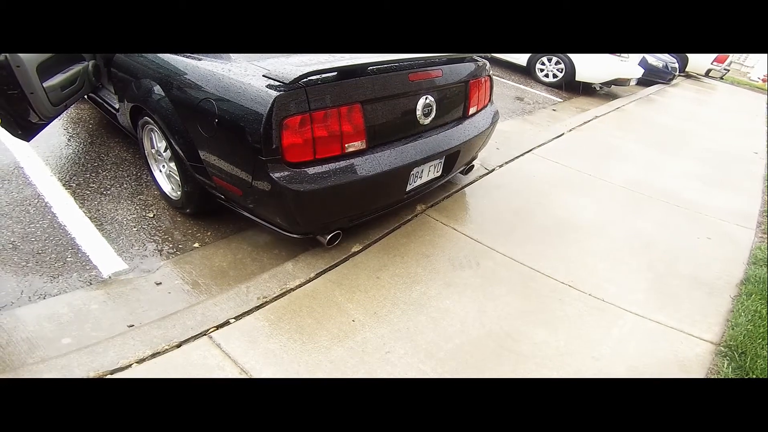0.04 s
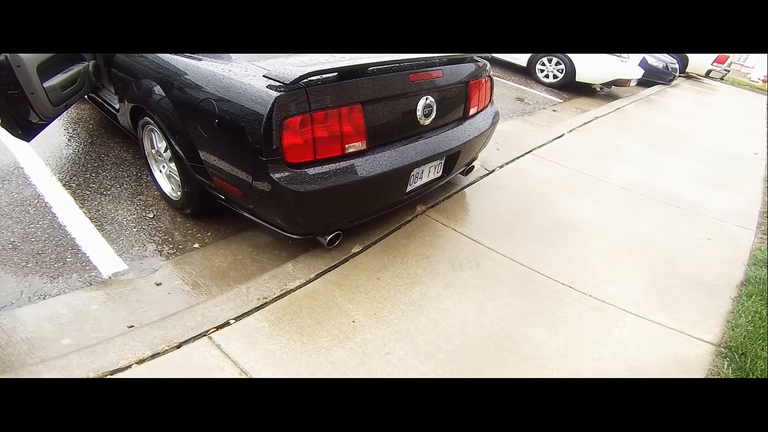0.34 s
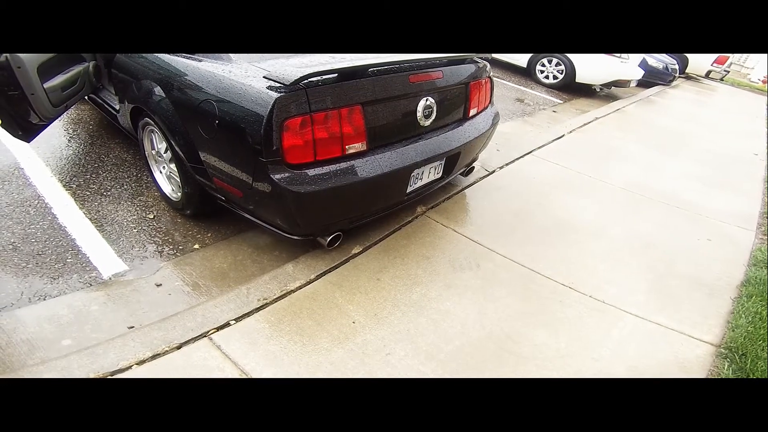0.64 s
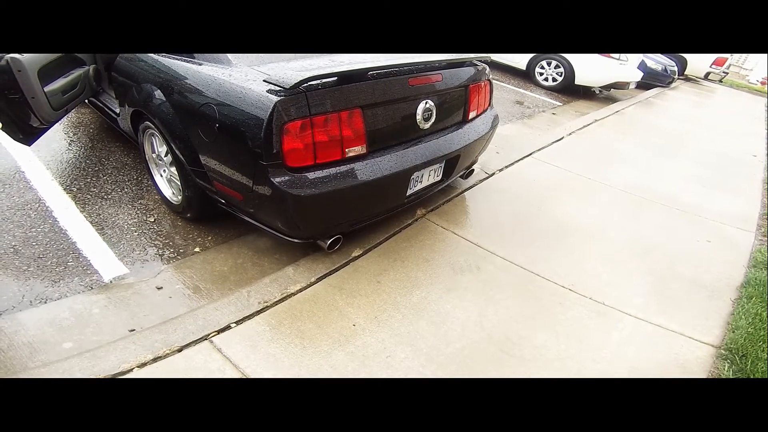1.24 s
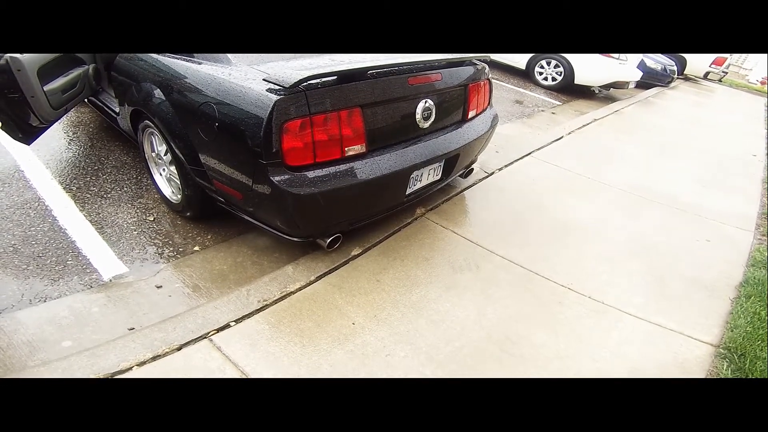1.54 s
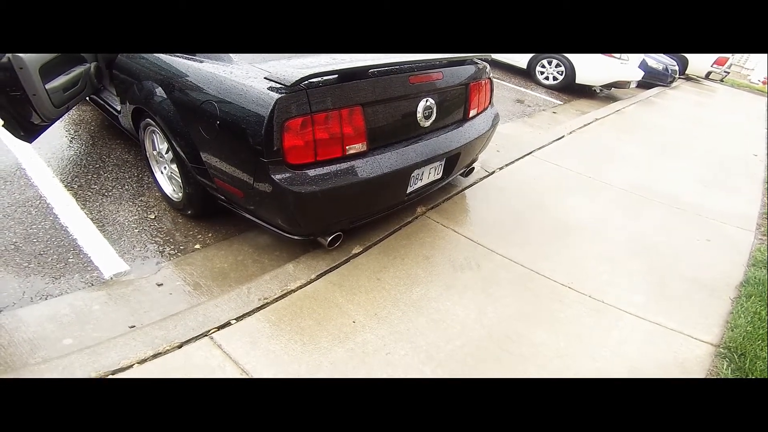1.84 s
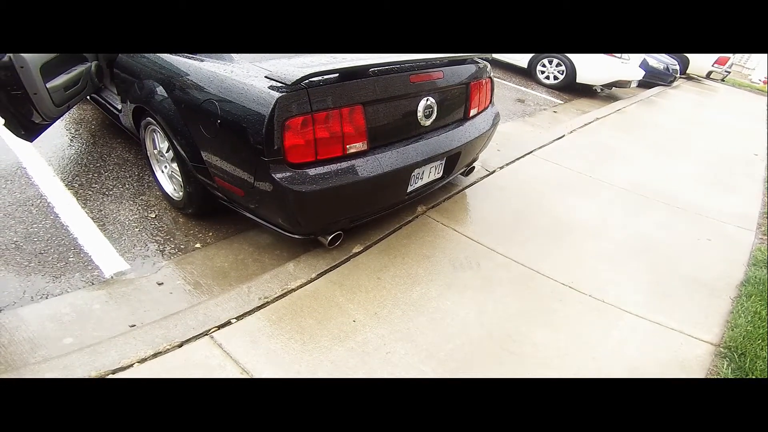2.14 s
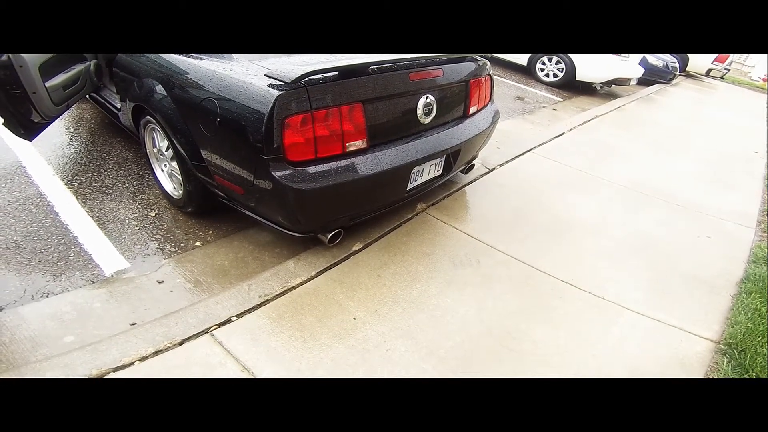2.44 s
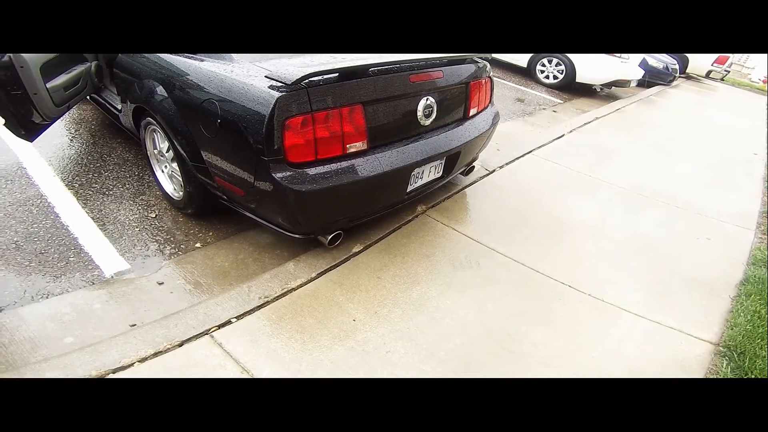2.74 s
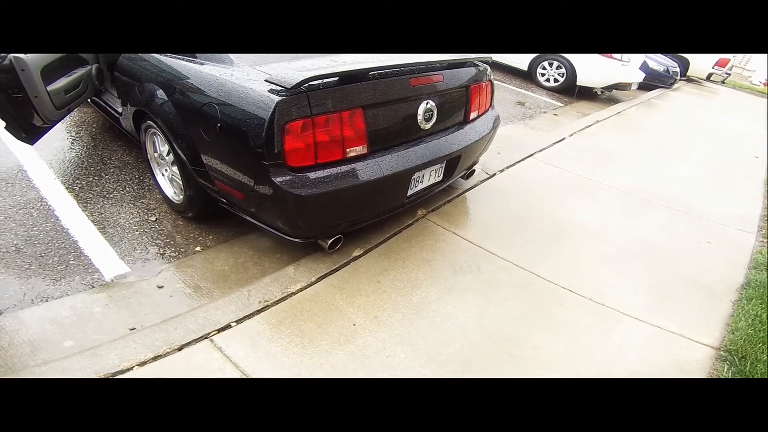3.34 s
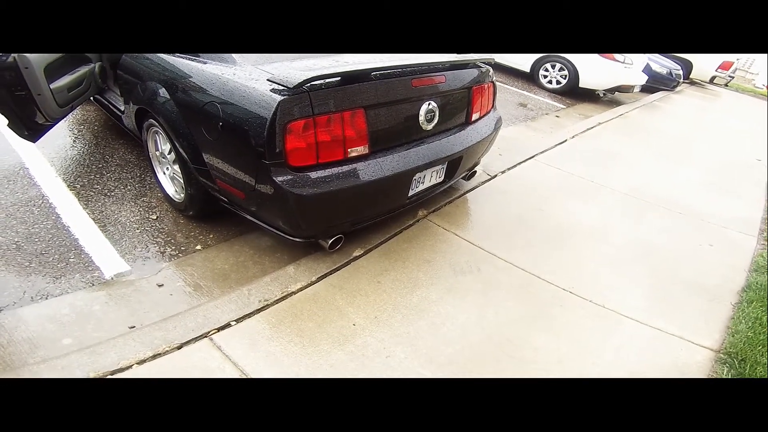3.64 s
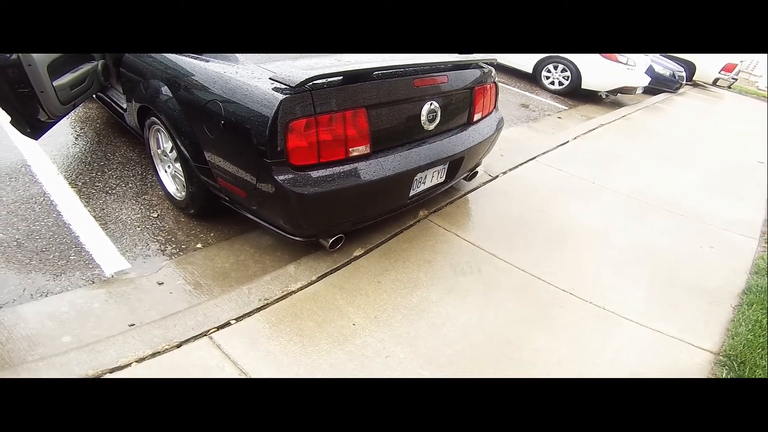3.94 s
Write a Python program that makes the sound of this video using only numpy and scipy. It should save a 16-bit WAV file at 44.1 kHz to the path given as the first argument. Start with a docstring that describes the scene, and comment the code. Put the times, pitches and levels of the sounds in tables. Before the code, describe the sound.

Car exhaust drones at idle, snarls through one quick rev and pops as it settles.

```python
"""A V8 car idles fast in the open air, heard from behind its tailpipes. Eight unequal firings
a cycle ring the exhaust and push out puffs of hissing gas. At 2.5 s one tap on the throttle
sends the revs up, and the pipes boom and snarl. From 3 s the revs fall and late-burning fuel
burbles unevenly. At 3.3 s one sharp crack echoes from the surroundings; by 4 s the engine idles again."""
import sys
import numpy as np
from scipy import signal
from scipy.fft import rfft, irfft, next_fast_len
from scipy.io import wavfile
from scipy.ndimage import uniform_filter1d

SR = 44100
rng = np.random.default_rng(int(sys.argv[2]) if len(sys.argv) > 2 else 0)


def store_pcm(level_fs):
    """Save levels as 16-bit WAV."""
    pcm = np.round(np.clip(level_fs, -1, 1) * 32767).astype(np.int16)
    wavfile.write(sys.argv[1], SR, np.atleast_2d(pcm).T)


N = 176400
T = np.arange(N) / SR


def from_db(db):
    """Decibels to gain."""
    return 10 ** (np.asarray(db) / 20)


def in_time(rows, column=1):
    """One column of a curve at every sample."""
    rows = np.array(rows)
    return np.interp(T, rows[:, 0], rows[:, column])


def colour(x, points):
    """Shape the tone with a (minimum-phase) filter that rings only after it is struck."""
    size = next_fast_len(N + SR // 4, True) // 2 * 2
    hz, db = np.transpose(points)
    log_hz = np.log(np.arange(size // 2 + 1) * SR / size + 1)
    cepstrum = irfft(np.log(from_db(np.interp(log_hz, np.log(hz), db))))
    cepstrum[1:size // 2] *= 2
    cepstrum[size // 2 + 1:] = 0
    return irfft(rfft(x, size) * np.exp(rfft(cepstrum)))[:N]


def rms_one(x):
    """Scale to an average (rms) level of 1."""
    return x / np.sqrt(np.mean(x ** 2) + 1e-20)


def evened(x, size=3700):
    """Hold the level at 1 over about one idle cycle."""
    power = uniform_filter1d(uniform_filter1d(x ** 2, size), size // 2)
    return x / np.sqrt(np.abs(power) + 1e-14)


def clicks(times, sizes):
    """Clicks at the given times."""
    out = np.zeros(N)
    inside = (times >= 0) & (times < (N - 1) / SR)
    np.add.at(out, np.round(times[inside] * SR).astype(int), sizes[inside])
    return out


def fade(x, seconds):
    """Each click jumps to its height and dies away."""
    return signal.lfilter([1], [1, -np.exp(-1 / (SR * seconds))], x + 1e-18)


def scattered(pulses, ring_s, size=2600):
    """A cylinder's own path through the mufflers: the same dying echoes on every cycle."""
    path = rng.standard_normal(size) * np.exp(-T[:size] / ring_s)
    return signal.fftconvolve(pulses, rms_one(path))[:N]


def resonance(x, hz, width_hz):
    """Ring at one moving pitch."""
    decay = np.exp(-np.pi * width_hz / SR)
    turn = np.exp(2j * np.pi * np.cumsum(hz) / SR)
    return np.real(turn * signal.lfilter([1], [1, -decay], x / turn))


def idle_then(idle_db, later_db, throttle_s=2.52):
    """Hold the idle level, then blend into a curve just before the throttle opens."""
    idling = np.clip((throttle_s - T) / 0.093, 0, 1)
    return idling * idle_db + (1 - idling) * later_db


# engine cycles (two turns each) per second: t/s, f/Hz
SPEED = [(0, 12.2), (.4, 12.08), (.8, 11.96), (1.2, 11.96), (1.6, 11.76), (1.8, 11.6), (2.5, 11.52),
         (2.545, 12.2), (2.628, 16.8), (2.696, 20.5), (2.808, 26.1), (2.922, 27.3), (3.0, 26.1),
         (3.1, 23.6), (3.218, 22.4), (3.344, 19.8), (3.544, 16.9), (3.75, 14.1), (4.0, 11.8)]
# cylinders in firing order: thump delay/firing gaps, level/dB, bark delay/firing gaps, level/dB
CYLINDERS = [(0.612, 1.5, .011, 1.2), (0.634, -2, .51, 6), (0.518, 3.5, .95, 1.2), (0.55, 0.05, -.244, 0.2),
             (0.582, 0.5, 1.029, 4), (0.606, 1.5, .953, 1.2), (0.538, 2.56, .706, -1.5),
             (0.517, 2.5, .446, -1.5)]
# uneven burning: t/s, scale of the differences between cylinders, random spread/dB
UNEVENNESS = [(0, 1.85, -0.06), (2.5, 0.91, 0.84), (2.63, 0.94, -0.1), (2.75, 0.38, 0), (2.951, 0.45, 1.3),
              (3.07, 1.37, 4.5), (3.3, 2.7, 3), (3.55, 1.65, 5), (3.75, 1.8, 4), (4, 1.1, 2.3)]


def firings(jitter_s=.00005):
    """Each firing gives a thump, a bark and a valve pulse; they are less regular off the throttle."""
    count = np.cumsum(in_time(SPEED)) / SR * len(CYLINDERS)
    k = np.arange(int(count[-1]))
    cylinder, table = k % len(CYLINDERS), np.array(CYLINDERS)
    s, scale, spread = np.transpose(UNEVENNESS)
    due_s = np.interp(k, count, T)
    scale, spread = np.interp(due_s, s, scale), np.interp(due_s, s, spread)
    capped = np.minimum(scale, 1)
    quirks = (table - table.mean(0))[cylinder].T * np.array([scale, scale, capped, capped])
    thump_late, thump_db, bark_late, bark_db = table.mean(0)[:, None] + quirks
    shift, change_db = spread * np.clip(rng.standard_normal((len(k), 2)), -2, 2).T
    thump_s = np.interp(k + thump_late, count, T) + jitter_s * shift
    bark_s = np.interp(k + bark_late, count, T) + jitter_s * shift
    thumps = clicks(thump_s, from_db(thump_db + change_db))
    barks = clicks(bark_s, from_db(bark_db + change_db))
    valves = [clicks(bark_s, from_db(change_db / 2) * (cylinder == c)) for c in range(len(CYLINDERS))]
    return thumps, barks, valves


# the pipes' low notes: f/Hz, level/dB
BASS_TONE = [(4, -78), (25, -24), (45, -26), (62, -7), (95, -7), (125, -18.5), (165, -14), (192, -41.5),
             (216, -25.5), (245, -35), (330, -68), (900, -109)]
# their rise and fall: t/s, level/dB
BASS_LEVEL = [(0, -15), (1.1, -14.5), (1.9, -14), (2.58, -12.5), (2.66, -15), (2.72, -25), (2.82, -30),
              (2.95, -40), (3.06, -20), (3.28, -29), (3.335, -43), (3.39, -25), (3.46, -21.5), (3.56, -21),
              (3.7, -24), (3.8, -22), (4, -20.5)]


def bass(thumps):
    """Thumps ring the pipes' deepest notes."""
    return -evened(colour(thumps, BASS_TONE)) * from_db(in_time(BASS_LEVEL) - 0.58)


# the pipes' middle notes: f/Hz, level/dB
BARK_TONE = [(100, -63), (280, -28), (320, -36), (355, -11.5), (385, -15.5), (405, -21.5), (422, -13),
             (442, -22.5), (462, -19), (520, -42.7), (660, -54), (840, -27.5), (890, -44.5), (950, -34),
             (1100, -53), (4000, -78.5)]
# their rise and fall after the idle: t/s, level/dB
BARK_LEVEL = [(2.52, -20), (2.66, -14.5), (2.72, -20.5), (2.77, -20.5), (2.97, -24), (3.02, -24.5),
              (3.11, -19.5), (3.24, -25.5), (3.3, -22.5), (3.33, -34.5), (3.4, -29), (3.46, -19),
              (3.5, -23.5), (3.7, -22.5), (3.85, -22), (4, -22.5)]
# tone of swirling gas: f/Hz, level/dB
RASP_TONE = [(20, -70), (150, -30.5), (300, 2.5), (420, 7), (480, 3), (570, 0.5), (680, -11), (840, 6),
             (980, 5.5), (1060, -9.5), (1180, -1), (1370, -20.5), (1550, -8), (1850, -14.5), (2200, -30.5),
             (4000, -59.5)]


def rough_bark(barks, growls, puffs):
    """Firings bark in the pipes and growl in the mufflers while swirling gas rasps."""
    speed = in_time(SPEED)
    growl_db = -10.5 + 0.6463 * (speed - speed.min())
    rasp_db = -12 - 1.1 * in_time(UNEVENNESS, column=2)
    uneven = np.clip(in_time(UNEVENNESS) + 0.084, 0, 1)  # even firing barks less
    bark = evened(colour(barks, BARK_TONE)) * uneven
    growl = evened(colour(growls, RASP_TONE)) * from_db(growl_db)
    rasp = evened(colour(puffs * rng.standard_normal(N), RASP_TONE)) * from_db(rasp_db)
    return (bark + growl + rasp) * from_db(idle_then(-18, in_time(BARK_LEVEL) + 1))


# tone of escaping gas: f/Hz, level/dB
HISS_TONE = [(900, -5.5), (1800, -1), (2270, -10), (2620, -2.5), (3200, -8), (3700, -4), (4370, 0.5),
             (4640, -0.5), (5040, -6.5), (5360, -4), (6450, 0), (7400, -11.5), (7900, -8.5), (9050, -6.5),
             (11000, -17), (13100, -21), (15000, -34)]
# its rise and fall after the idle: t/s, level/dB
HISS_LEVEL = [(2.52, -32.5), (2.59, -23.5), (2.675, -19.5), (2.71, -30), (2.78, -18), (2.87, -24),
              (2.99, -28.5), (3.07, -45.5), (3.10, -27.5), (3.25, -48), (3.34, -37), (3.4, -44.5),
              (3.465, -41.5), (3.5, -46), (3.535, -39), (3.69, -49), (3.85, -44.5), (4, -48)]


def hiss(growls, puffs, idle_db=-35):
    """Gas hisses out and rings the tailpipes; any level above idle becomes a hard blast."""
    gas = evened(puffs * rng.standard_normal(N)) + from_db(-17) * evened(growls)
    level = from_db(idle_then(idle_db, in_time(HISS_LEVEL) - 0.5))
    gentle = np.minimum(level, from_db(idle_db))
    soft_jet = evened(colour(gas, HISS_TONE)) * gentle
    return soft_jet + rings(gas) * np.sqrt(gentle * level) + blast(gas) * (level - gentle)


# the tailpipes' metallic notes: f/Hz, width/Hz, level/dB relative to the hiss
RINGS = [(1527.5, 20.4, -6.5), (2610, 18, -15.5), (4663, 60, -9), (5340, 100, -12.5)]
# hot gas raises their pitch: t/s, pitch ratio
HEAT = [(2.6, 1), (2.79, 1.09), (3.0, 1.1), (3.3, 1)]


def rings(gas):
    """Rushing gas makes the tailpipes ring."""
    heat = in_time(HEAT)
    return sum(from_db(db) * rms_one(resonance(gas, hz * heat, width)) for hz, width, db in RINGS)


# tone of the outdoors: f/Hz, level/dB
AIR_TONE = [(4, -32), (25, -10), (100, 13), (1000, -11), (5000, -29.5), (15000, -68)]


def air():
    """Outdoor air rumbles faintly."""
    return from_db(-32.5) * rms_one(colour(rng.standard_normal(N), AIR_TONE))


# booming engine notes: multiple of the cycle rate, start t/s, end t/s, level/dB
BOOMS = [(24, 1.68, 2.54, -31), (32, 2.78, 3.02, -29), (36, 2.75, 3.02, -30), (8, 2.74, 3.04, -28),
         (16, 2.72, 3.02, -17), (14, 2.74, 3.0, -25), (6, 3.03, 3.31, -22), (4, 3.02, 3.27, -29),
         (5, 3.42, 3.6, -23), (4, 3.48, 3.64, -23), (3, 3.42, 3.66, -30)]


def booms(fade_s=0.035):
    """Single engine notes swell at set times, as when the revs sweep them past a pipe's own pitch."""
    cycles = np.cumsum(in_time(SPEED)) / SR
    out = np.zeros(N)
    for multiple, start, end, db in BOOMS:
        swell = np.clip(np.minimum(T - start, end - T) / fade_s, 0, 1)
        out += np.sqrt(2) * from_db(db) * swell * np.cos(2 * np.pi * multiple * cycles)
    return out


# two crackling cylinders: place in the cycle/firing gaps
CRACKLE_PLACES = [4.0, 7.2]
# tone of their snarl: f/Hz, level/dB
SNARL_TONE = [(300, -14), (560, 6.5), (740, -13), (870, 6), (1250, -2), (1400, -32), (1650, -8),
              (2400, -23)]
# tone of the hard jet of gas: f/Hz, level/dB
BLAST_TONE = [(800, -37), (1900, -0.5), (2400, -24), (3400, -21), (4400, -5), (5200, -1.5), (6500, -1.5),
              (7400, -8.5), (8800, -5.5), (11000, -14.5), (15000, -49)]


def blast(gas):
    """Under throttle, shocks from two cylinders make the jet surge and the mufflers snarl."""
    cycles = np.cumsum(in_time(SPEED)) / SR
    k = np.arange(int(cycles[-1]))
    shock_times = [np.interp(k + place / len(CYLINDERS), cycles, T) for place in CRACKLE_PLACES]
    shocks = [clicks(times, np.ones(len(k))) for times in shock_times]
    surge = evened(fade(sum(shocks), seconds=.009)) + 1.3
    echoes = sum(scattered(pulses, ring_s=0.0082) for pulses in shocks)
    snarl = from_db(-0.5) * evened(colour(echoes, SNARL_TONE))
    return evened(colour(gas * surge, BLAST_TONE)) + snarl


# small pops in the pipe: t/s, peak level/dB
BURBLES = [(2.661, -20), (2.759, -11), (3.087, -9), (3.105, -7.5), (3.171, -11), (3.215, -12.5),
           (3.261, -8.5), (3.279, -4.5), (3.416, -13.5), (3.457, -9.5), (3.523, -11.5), (3.568, -15),
           (3.593, -21), (3.664, -14.5)]


def burbles():
    """Late-burning fuel thuds in the pipe, each time with a spit of gas."""
    s, db = np.transpose(BURBLES)
    pulses = clicks(s, from_db(db))
    thuds = colour(pulses, RASP_TONE)
    spit = fade(pulses, seconds=0.011) * rms_one(colour(rng.standard_normal(N), HISS_TONE))
    return -thuds / np.abs(thuds).max() * pulses.max() + from_db(-24) * spit


# the crack and its echoes: t/s, level/dB, decay/s
CRACKS = [(3.2823, -5, 0.0051), (3.286, -27.5, 0.026), (3.307, -20.5, 0.0089)]
# their tone: f/Hz, level/dB
CRACK_TONE = [(200, 15), (700, 8.5), (1300, -2), (2400, 1.5), (3200, -15), (4600, 2), (6500, 4.5),
              (7500, -1), (9500, -0.5), (12000, -13), (15000, -19)]


def crack():
    """A sharp pop at the tailpipe bounces off the surroundings."""
    level = sum(from_db(db) * (T >= s) * np.exp(-np.abs(T - s) / decay) for s, db, decay in CRACKS)
    return level * rms_one(colour(rng.standard_normal(N), CRACK_TONE))


def scene():
    """The exhaust over faint outdoor air."""
    outdoors = air()
    thumps, barks, valves = firings()
    growls = sum(scattered(pulses, ring_s=0.012) for pulses in valves)
    puffs = evened(fade(sum(valves), seconds=0.0091)) + 2.13  # on top of a steady flow
    exhaust = bass(thumps) + rough_bark(barks, growls, puffs) + hiss(growls, puffs)
    return (exhaust + outdoors + booms() + burbles() + crack())[None]


def record(dry):
    """Clip the peaks and cut the highest treble."""
    treble_cut = signal.ellip(10, .2, 80, 15200, fs=SR, output="sos")
    return signal.sosfilt(treble_cut, np.clip(dry, -.95, .95))


dry = scene()
out = record(dry)
store_pcm(out)
```